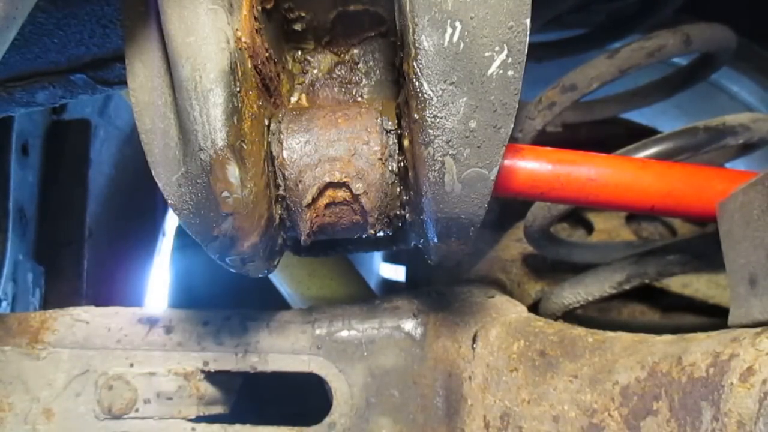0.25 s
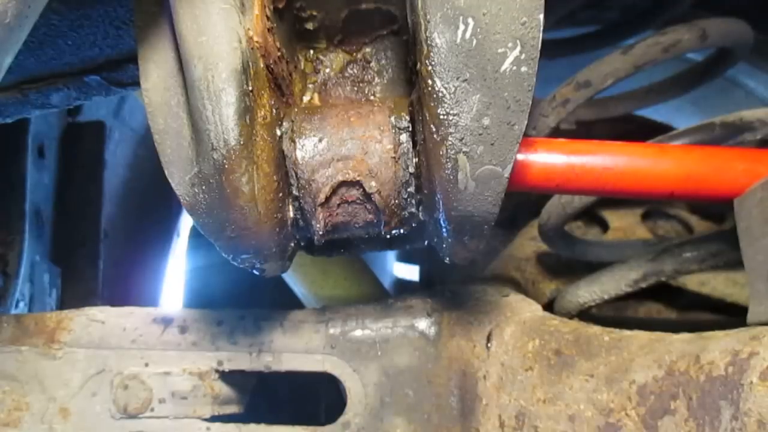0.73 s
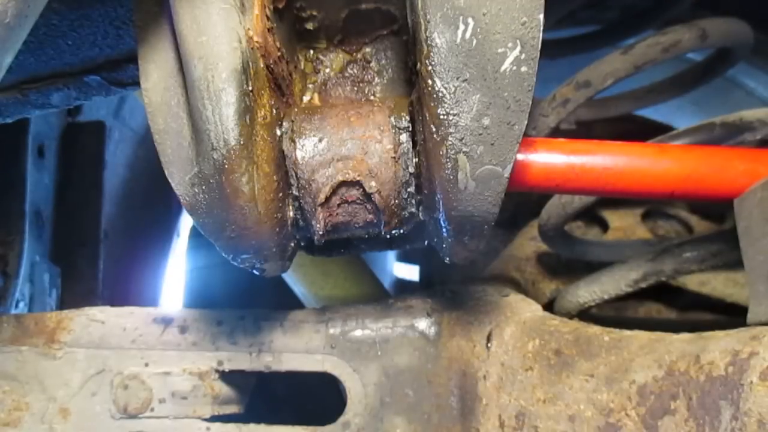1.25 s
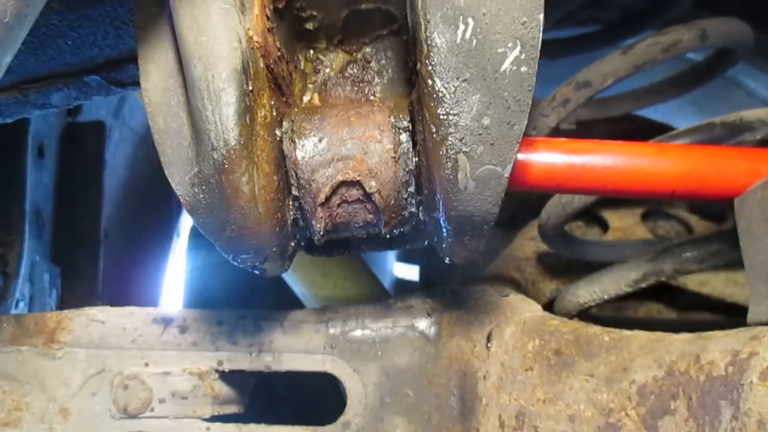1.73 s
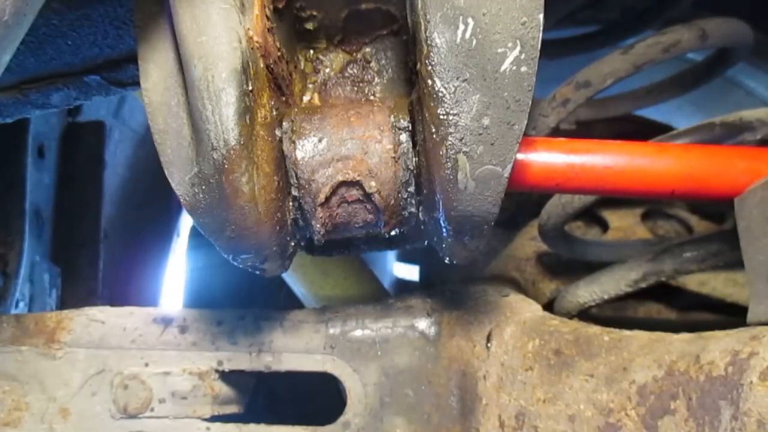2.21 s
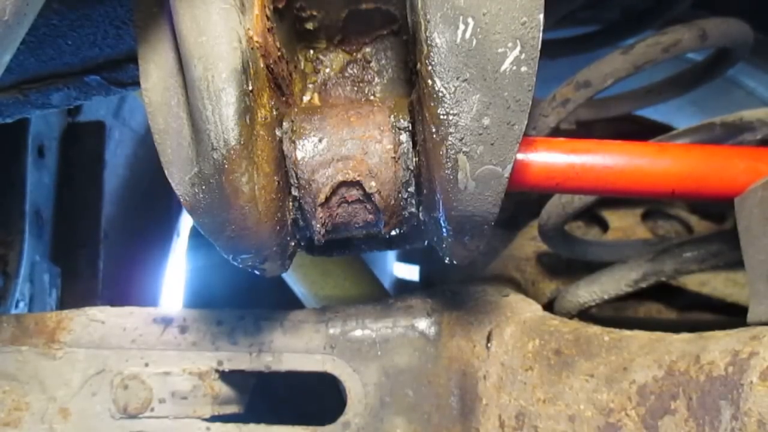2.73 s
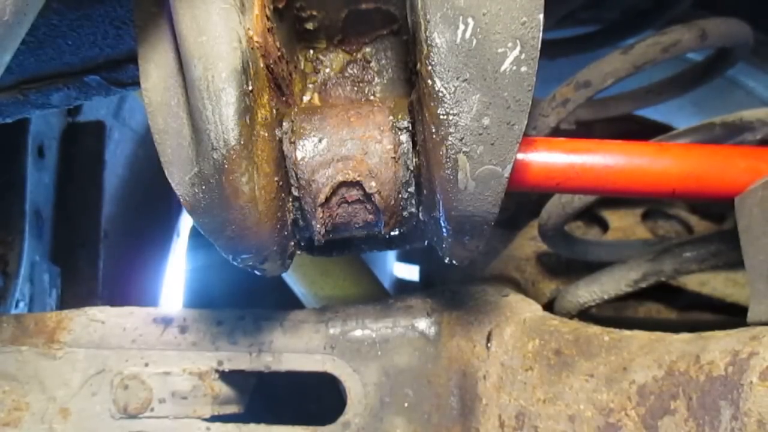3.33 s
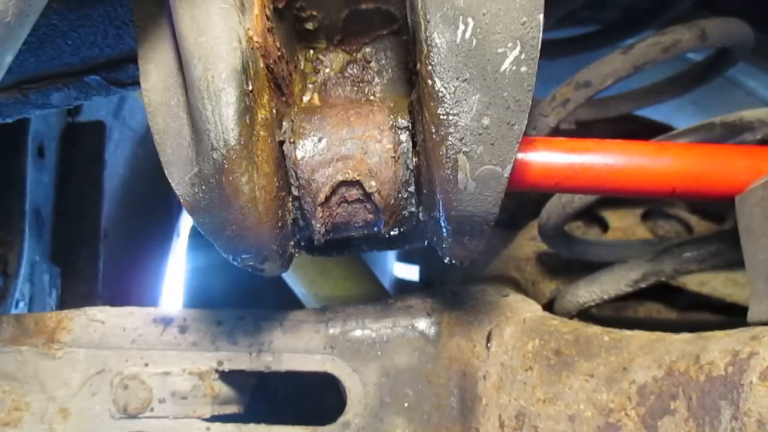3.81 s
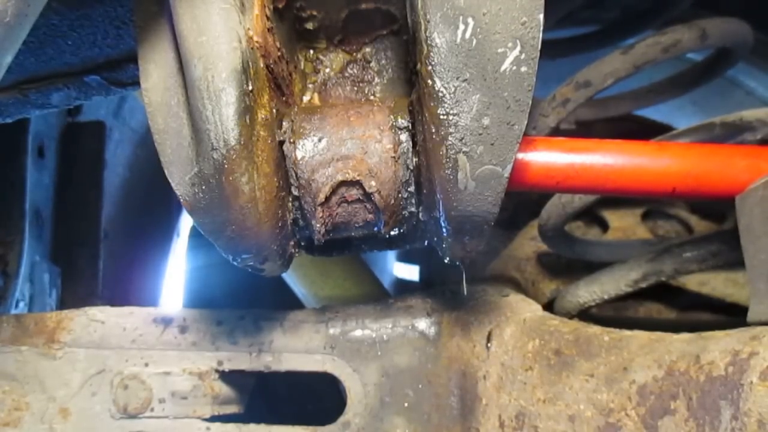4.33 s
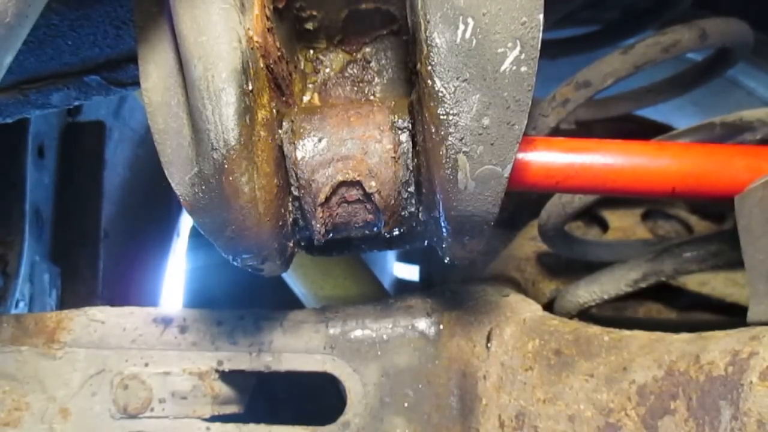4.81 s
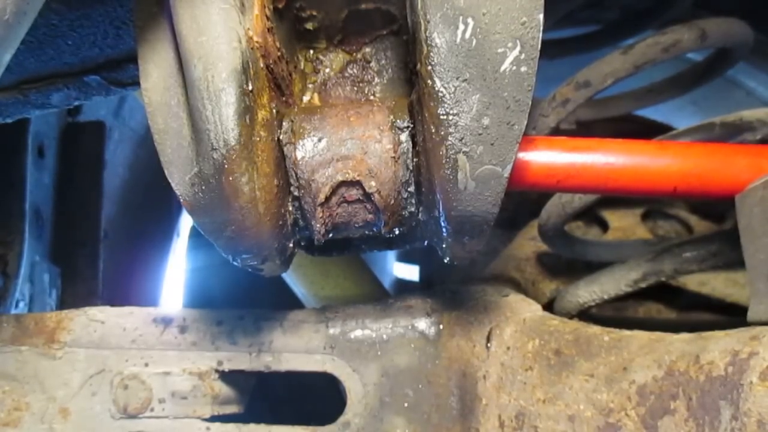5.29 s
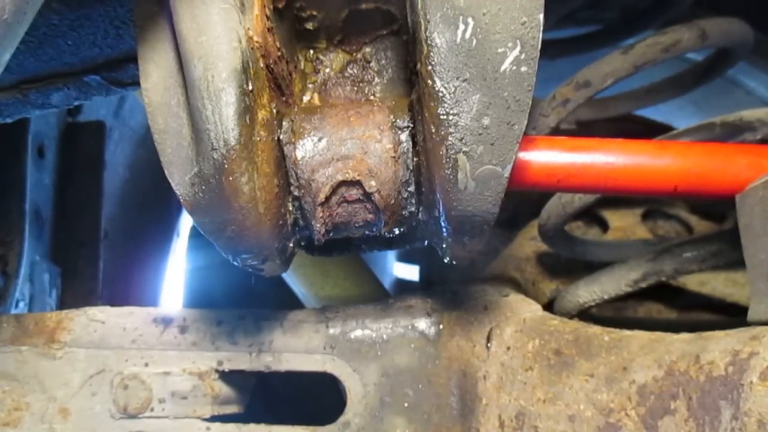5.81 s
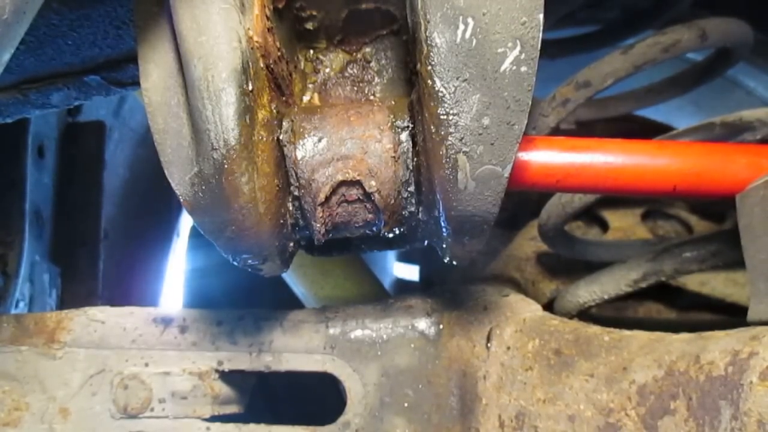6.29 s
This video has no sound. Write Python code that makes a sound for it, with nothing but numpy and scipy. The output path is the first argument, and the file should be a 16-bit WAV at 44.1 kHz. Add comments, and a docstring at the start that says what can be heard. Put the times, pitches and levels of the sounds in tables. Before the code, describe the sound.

After a brief windy rush on the microphone and a fading metallic clatter, eight heavy hammer blows land on a steel punch against a rusty vehicle part, about three quarters of a second apart. Each is a sharp crack with a short hollow thud, some with a small bounce. Thin high steel tones and ticking rust flakes follow over quiet rumble and hiss. Very close, slightly overloaded microphone.

```python
"""Hammer blows on a rusty part

A hammer strikes a steel punch eight times against a rusty part, close to the microphone, and at times bounces.
Part and frame thud as dying sines under a crash of noise bands; punch and hammer ring on as thin steel tones.
Flakes of rust tick down as bursts of noise; wind, rumble and hiss are shaped noise, with a clatter dying early on.
The recorder's gain control, wide open at first, ducks wind and hiss from the first blow on."""
import sys
import numpy as np
from scipy import signal
from scipy.fft import rfft, irfft
from scipy.io import wavfile
from scipy.ndimage import uniform_filter1d

SR = 44100
rng = np.random.default_rng(int(sys.argv[2]) if len(sys.argv) > 2 else 0)


def boost(x):
    """Linear amplitude factor 10**(x/20) for a level x in decibels (scalar or array-like)."""
    u = np.asarray(x, float) / 20
    return 10 ** u


def generate_wav(signal):
    """Clip the signal to [-1, 1] and save it as 16-bit WAV at the path in sys.argv[1]."""
    frames = np.transpose(np.atleast_2d(signal))
    scaled = np.clip(frames, -1, 1) * 32767
    pcm = np.round(scaled).astype(np.int16)
    wavfile.write(sys.argv[1], SR, pcm)


N = 288855

# blows and bounces: (time [s], strength [dB], brightness [dB per octave], decay factor [1])
BLOWS = [(.6190, 1, 0.42, 0.45), (.6880, -23, -1, 0.5), (1.3632, -0.5, 1.2, 0.82),
         (2.1542, -1.5, 0.5, 0.82), (2.902, -0.5, .5, .9), (2.9791, -11.5, -1.5, .6),
         (3.6430, -2, 0.95, 0.82), (4.3953, -3.5, 0.3, 0.98), (4.452, -35.5, 4, .9), (5.129, 0.5, 0, .8),
         (5.1719, -22, 1.2, 0.96), (5.191, -15.5, -3, 0.65), (5.841, -1, 1.2, 0.83)]
# backswings: (time of the blow [s], ring level [dB], time until the hammer turns [s], swell towards the turn [dB])
SWINGS = [(.619, -61, .2, 8), (1.3631, -48, .21, 13), (2.1531, -46, .185, 9), (2.9024, -42, .175, 7),
          (3.643, -39, .185, 9), (4.3953, -59, .16, 4), (5.129, -52, .17, 4), (5.841, -35, .15, 6)]


def evened(x):
    """Scales to an rms of one."""
    return x / np.sqrt(np.mean(x ** 2) + 1e-20)


def read(points, hz):
    """Value of a (frequency, value) table at hz, interpolated over log frequency."""
    f, value = np.transpose(points)
    return np.interp(np.log(hz + 1), np.log(f + 1), value)


def add(mix, s, sound):
    """Mixes a sound in at s seconds, cut off at the end of the mix."""
    part = mix[round(s * SR):][:len(sound)]
    part += sound[:len(part)]


def coloured(x, db_at):
    """Filters x by a gain in dB given as a function of frequency."""
    gain = boost(db_at(np.fft.rfftfreq(len(x), 1 / SR)))
    return irfft(rfft(x) * gain, len(x))


def band(x, hz, width):
    """One resonance."""
    return signal.lfilter(*signal.iirpeak(hz, hz / width, SR), x)


def noise_band(hz, width):
    """Noise through one resonance, at an rms of one."""
    return evened(band(rng.standard_normal(N), hz, width))


def rumble_and_hiss():
    """One shaped noise split around 1.2 kHz: a distant rumble nears and recedes, the hiss follows a little and thins."""
    # room noise: (frequency [Hz], level [dB per Hz])
    room_colour = [(18, -36), (30, -5), (55, 2.5), (185, 1.5), (254, -8), (330, -7.5), (367, -17),
                   (408, -10.5), (453, -18), (622, -17.5), (1300, -28), (2870, -26), (8450, -34.5),
                   (14700, -47), (16300, -55.5)]
    # nearness of the rumble: (time [s], level [dB])
    nearness = [(0, -12), (.9, -1.5), (1.7, 3.5), (3.4, 6.5), (4.1, -3.5), (4.8, 3.5), (5.5, 0), (6.1, 4),
                (6.55, -9)]
    hiss_db, hiss_follow, hiss_fade_db_per_s = 1, 0.2, 0.97
    t = np.arange(N) / SR
    room = evened(coloured(rng.standard_normal(N), lambda hz: read(room_colour, hz)))
    rumble = coloured(room, lambda hz: -20 * np.log10(1 + (hz / 1200) ** 4))
    hiss = room - rumble
    near_db = np.interp(t, *np.transpose(nearness))
    hiss_level_db = hiss_db + hiss_follow * near_db - hiss_fade_db_per_s * t
    return boost(-62) * (boost(near_db) * rumble + boost(hiss_level_db) * hiss)


def wind():
    """Low noise whose level puffs up in bell-shaped gusts over a steady draught."""
    # puffs on the microphone: (time [s], level [dB], half length to 1/e [s])
    gusts = [(.07, -59, .12), (.192, -49, 0.062), (.272, -42, 0.012), (.34, -44, 0.03), (.5, -62.5, 0.19),
             (2.0, -64, 0.8)]
    draught_db = -69
    # (frequency [Hz], level [dB per Hz])
    wind_colour = [(8, -24.5), (25, 0.0), (70, 2.5), (130, -14), (300, -35.5), (900, -71.0)]
    t = np.arange(N) / SR
    gust = sum(boost(db) * np.exp(-((t - s) / half_s) ** 2) for s, db, half_s in gusts)
    rush = evened(coloured(rng.standard_normal(N), lambda hz: read(wind_colour, hz)))
    return (boost(draught_db) + gust) * rush


def clatter():
    """An earlier clatter dying away: bands of noise, each with its own decay."""
    # (frequency [Hz], width [Hz], level at the start [dB], t60 [s])
    clatter_bands = [(590, 37, -55, 0.57), (830, 100, -68, 1.3), (1190, 130, -61.5, 0.99),
                     (1635, 83, -64.5, 0.56), (2403, 520, -73, 1.1), (3628, 270, -75.5, 0.72),
                     (5350, 300, -78.5, 1.2), (11000, 6000, -80, 2.1)]
    t = np.arange(N) / SR
    return sum(boost(db - 60 * t / t60) * noise_band(hz, width) for hz, width, db, t60 in clatter_bands)


def hums():
    """Steady narrow bands of noise within the rumble."""
    # (frequency [Hz], width [Hz], level [dB])
    hum_bands = [(241, 19, -71), (404, 25, -75.5), (783, 50, -80.5)]
    return sum(boost(db) * noise_band(hz, width) for hz, width, db in hum_bands)


def knocks():
    """Small soft knocks and a squeak before the first blow: short sines that swell and fade."""
    # (time [s], level [dB], frequency [Hz], length [s])
    soft_knocks = [(0.319, -73, 5180, .025), (0.471, -64.5, 705, .018), (0.557, -66, 340, .022)]
    out = np.zeros(N)
    for s, db, hz, length in soft_knocks:
        t = np.arange(0, length, 1 / SR)
        add(out, s, boost(db) * np.sin(2 * np.pi * hz * t) * np.hanning(len(t)))
    return out


def flakes():
    """Each flake of rust is a short dry tick of bright and duller noise with a faint after-rustle."""
    # the clearest flakes: (time [s], level [dB], duller part against the treble [dB])
    clear_flakes = [(0.9984, -59, -8.5), (1.6232, -55, -6), (1.6574, -56, -11), (1.6994, -61, 2),
                    (1.7374, -53, -9), (1.7564, -60.5, 4), (1.8058, -56, 1.5), (1.8274, -56, -10.5),
                    (2.4867, -57.5, -14.5), (2.5526, -56.5, -3.5), (3.2144, -60.5, 4), (3.2201, -51, 4.5),
                    (3.2474, -51.5, 3), (3.2565, -50, -3), (3.2864, -53, -8), (3.9774, -50.5, 2.5),
                    (4.6404, -65, 11), (4.7017, -61, -6), (4.7074, -59, 4.5), (4.7314, -61, -5),
                    (4.7624, -61.5, -6), (4.7745, -54.5, -15), (5.0365, -64.5, -9), (5.5274, -57, -3.5),
                    (6.1664, -62, -7), (6.1884, -62.5, -3), (6.2164, -65, 7), (6.2582, -56.5, -3)]
    dust_db, dust_spread_db = -69, 3
    fall_s, fall_spread_s = .36, .07
    out, t = np.zeros(N), np.arange(2048) / SR
    # three grains of finer dust land a moment after each full blow
    late, size, dullness = rng.standard_normal((len(SWINGS) * 3, 3)).T
    landing = np.repeat([row[0] for row in SWINGS], 3) + fall_s + fall_spread_s * late
    dust = zip(landing, dust_db + dust_spread_db * size, -6 + 4 * dullness)
    shape = boost(-60 * t / .022) + boost(-13 - 60 * t / .07)  # tick and after-rustle
    for s, db, dull_db in [*clear_flakes, *dust]:
        bright, dull = rng.standard_normal((2, len(t)))
        bright = evened(band(bright, rng.uniform(4900, 10500), 5400))
        dull = evened(band(band(dull, 2500, 2600), 2500, 2600))
        add(out, s, boost(db) * (bright + boost(dull_db) * dull) * shape / 2)
    return out


def swing():
    """One thin steel tone fades, swells as the hammer turns, then sags, falls away and beats with its reflection."""
    ring_hz, sag_hz, sag_late_s, sag_s = 6411, 15, 0.033, .09  # the pitch sags while the head moves away
    fade_db_per_s, away_db_per_s, away_s, swell_s = 70, 135, .15, .04
    echo_gain, beat_hz, beat_slows_s = .7, 21, .3  # the beat slows as the swing comes to rest
    out, t = np.zeros(N), np.arange(0, .7, 1 / SR)
    for s, db, turn_s, swell_db in SWINGS:
        away = np.maximum(t - turn_s, 0)
        hz = ring_hz - sag_hz * np.exp(-((t - turn_s - sag_late_s) / sag_s) ** 2)
        phase = 2 * np.pi * np.cumsum(hz) / SR
        # the level swells as the face points this way, and the swell stays on after the turn
        swell = swell_db * np.exp(-(np.minimum(t - turn_s, 0) / swell_s) ** 2)
        level_db = db - fade_db_per_s * t - away_db_per_s * np.minimum(away, away_s) + swell
        # the hammer has turned away, so the reflection competes
        echo = echo_gain * np.clip(away / 0.02, 0, 1)
        beat_phase = 2 * np.pi * beat_hz * beat_slows_s * (1 - np.exp(-away / beat_slows_s))
        tone = np.sin(phase) + echo * np.sin(phase + beat_phase)
        add(out, s, np.sqrt(2) * boost(level_db) * tone * np.minimum(t / .02, 1))
    return out


def clock(t, chatter_s, hz):
    """Time that counts for the decay: chatter keeps feeding all but the highest tones."""
    fed = 0.88 / (1 + (hz / 5000) ** 2)
    return t - fed * np.minimum(t, chatter_s)


def ring(modes, t, chatter_s=0, spread_db=0, rattle=0):
    """Sum of dying sines, struck harder, softer or later by chance; loose joints make them waver."""
    hz, db, t60 = np.transpose(modes)[:, :, None]
    db = db + spread_db * rng.standard_normal(db.shape)
    # the blow travels through the part, the bass comes last
    late = np.maximum(t - .004 * rng.random(db.shape) - 1.5 / hz, 0)
    side = (-1.) ** np.arange(len(hz))[:, None]  # neighbouring modes start in opposite directions
    rate, start = rng.random((2, *db.shape))
    waver = 1 + rattle * np.sin(2 * np.pi * ((8 + 25 * rate) * t + start))
    decay = boost(db - 60 * clock(late, chatter_s, hz) / t60)
    return (side * waver * decay * np.sin(2 * np.pi * hz * late)).sum(0)


def steel_rings():
    """Full blows set the bracket, punch and hammer head ringing freely as sines, each blow in its own balance."""
    # free rings: (frequency [Hz], level within its piece [dB], t60 [s], piece: 0 bracket, 1 punch, 2 hammer cheek)
    steel = [(1022, 9, .33, 0), (1152, 2, .5, 0), (1707, 0, .5, 0), (1949, -6, .45, 0), (2352, 1, .42, 1),
             (4050, -11, .4, 1), (4074, -16, .4, 1), (4110, -1, .13, 2), (4170, -3, .12, 2),
             (4245, -3, .1, 2)]
    # where each full blow lands decides what it wakes:
    # (bracket [dB], punch [dB], cheek [dB], share of the upper twin [0-1])
    wakings = [(-72, -42, -40, 0), (-66, -52, -19, .25), (-56, -40, -28, .85), (-58, -46, -28, .85),
               (-62, -56, -30, .95), (-54, -48, -34, .8), (-45, -64, -38, .85), (-60, -56, -19, .98)]
    face_hz, face_db, face_t60 = (11677, 11725), -38, .23  # twin rings of the hammer face: (lower [Hz], upper [Hz])
    out, t = np.zeros(N), np.arange(2 ** 15) / SR
    full = [s for s, strength_db, _, _ in BLOWS if strength_db > -8]
    for s, (*wakes, upper) in zip(full, wakings):
        twins = np.zeros(len(t))
        for hz, share in zip(face_hz, (1 - upper, upper)):
            twins += np.sqrt(share) * ring([(hz, face_db, face_t60)], t)
        woken = [(hz, db + wakes[piece], t60) for hz, db, t60, piece in steel]
        add(out, s, boost(2) * (twins + ring(woken, t, rattle=0.24)))
    return out


def crash(t, tilt_db, stretch, chatter_s):
    """The countless close modes of part and frame: noise in half-octave bands, quick and slow decays, a crack on top."""
    # (frequency [Hz], level [dB per Hz])
    crash_colour = [(40, -6.5), (200, -10), (600, -4), (1300, -10), (2240, -7.5), (3500, -11.5),
                    (7000, -16), (11800, -25), (15100, -36.5), (16300, -51.5)]
    # quick decay before the blow's decay factor and chatter: (frequency [Hz], t60 [s])
    quick_t60 = [(60, .3), (250, .22), (600, 0.11), (1500, 0.094), (3000, 0.049), (6000, 0.064),
                 (12000, 0.06)]
    # slow decay: (frequency [Hz], t60 [s])
    slow_t60 = [(60, .6), (250, .5), (800, 0.22), (2500, 0.28), (6000, 0.16), (12000, .18)]
    crack_db, crack_t60, tail_db = 3, 0.0027, -26
    noise = evened(coloured(rng.standard_normal(len(t)), lambda hz: read(crash_colour, hz)))
    out = np.zeros(len(t))
    for hz in np.geomspace(45, 16000, 18):
        piece = coloured(noise, lambda f: -96 * np.log2((f + 1) / hz) ** 2)
        decay = boost(-60 * clock(t, chatter_s, hz) / (stretch * read(quick_t60, hz)))
        decay += boost(tail_db - 60 * t / read(slow_t60, hz))
        if hz > 1500:
            decay += boost(crack_db - 60 * t / crack_t60)
        rise = 1 - np.exp(-t * hz / 0.5)  # bass builds up later than treble
        out += boost(tilt_db * np.log2(hz / 1000)) * piece * decay * rise
    return out


def thuds():
    """Every contact of the hammer rings part and frame as dying sines and sets off a crash."""
    # the struck part, before brightness and decay factor of the blow: (frequency [Hz], level [dB], t60 [s])
    part_modes = [(90, -14.5, 0.26), (131.5, -16, 0.16), (207.6, -18, 0.29), (252.6, -4, 0.11),
                  (402.5, -5.5, 0.029), (507.9, -7.5, 0.044), (565.5, -7.5, 0.11), (705, -15, 0.16),
                  (821, -7.5, 0.22), (909, -6, 0.12), (1058, 0, 0.056), (1191, -5, .075),
                  (1334, -11, 0.052), (1428, -11.5, 0.034), (1532, -9.5, .07), (1696, -11, 0.011),
                  (1910, -20, 0.023), (1947, -8.5, 0.071), (2236, -4, 0.088), (2427, -13.5, 0.087),
                  (2730, -16, 0.12), (2900, -6, 0.069), (3060, -10, 0.033), (3600, -10.5, 0.081),
                  (3800, -12, 0.081)]
    # the frame behind the part rings low and longer: (frequency [Hz], level [dB], t60 [s])
    frame_modes = [(253, -7.5, 0.37), (356, -15.5, 0.26), (412.4, -2.5, 0.29), (474, -17, 0.32),
                   (575, -15, 0.32), (736, -13, 0.18), (855, -9.5, .17), (862, -15.5, .24),
                   (996, -11.5, 0.28), (1068, -14.5, .25), (1230, -22.5, 0.38), (1464, -20, 0.15),
                   (1560, -21.5, 0.15)]
    part_db, crash_db = -10, -6
    frame_db, frame_follow = -24, 0.45  # the frame follows only part of the strength in dB
    out, t = np.zeros(N), np.arange(2 ** 15) / SR
    for s, db, tilt_db, stretch in BLOWS:
        # the punch chatters on after contact, shorter for weak or damped blows
        chatter_s = 0.019 * stretch * boost(.35 * db)
        modes = [(hz, level + tilt_db * np.log2(hz / 1000), t60 * stretch) for hz, level, t60 in part_modes]
        part = boost(part_db) * ring(modes, t, chatter_s, spread_db=4.0, rattle=.5)
        burst = boost(crash_db) * crash(t, tilt_db, stretch, chatter_s)
        frame = boost(frame_db + frame_follow * db) * ring(frame_modes, t, spread_db=3.0, rattle=.7)
        add(out, s, boost(db) * (part + burst) + frame)
    return out


def scene():
    """All sources at one microphone."""
    hammer = thuds() + steel_rings() + swing()
    debris = flakes() + knocks()
    air = rumble_and_hiss() + wind() + clatter() + hums()
    return (hammer + debris + air)[None]


def duck(x, over_db, back_db_per_s, fall_s):
    """Gain that lowers x by as much as its level passes over_db, falling fast and creeping back."""
    level_db = 10 * np.log10(abs(uniform_filter1d(x ** 2, 90, origin=44)) + 1e-12)
    creep = np.arange(N) * back_db_per_s / SR
    held_db = np.maximum.accumulate(level_db + creep, -1) - creep  # peaks held, sinking steadily
    excess = np.maximum(held_db - over_db, 0)
    r = np.exp(-1 / (fall_s * SR))
    return boost(-signal.lfilter([1 - r], [1, -r], excess))


def low_pass(x):
    """Removes everything above the highest recorded frequency."""
    return signal.sosfilt(signal.butter(12, 16480, fs=SR, output="sos"), x)


def record(dry):
    """Gain control, wide open at first, falls at each blow and creeps back; the input clips softly, then hard."""
    loud = dry * boost(21) * duck(dry, over_db=-27, back_db_per_s=11.0, fall_s=0.00047)
    clipped = np.clip(1.3 * np.tanh(loud / 1.3), -.93, .93)
    smooth = signal.lfilter(*signal.butter(10, 15800, fs=SR), clipped)
    steady = signal.lfilter(*signal.butter(1, 14, "high", fs=SR), smooth)
    return low_pass(steady)


dry = scene()
out = record(dry)
generate_wav(out)
```